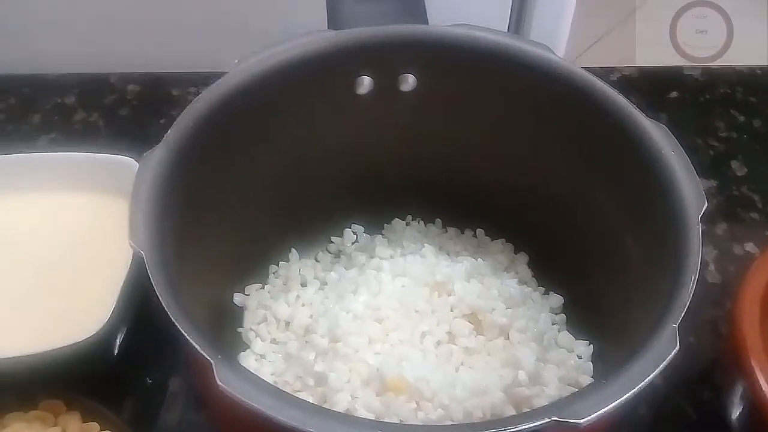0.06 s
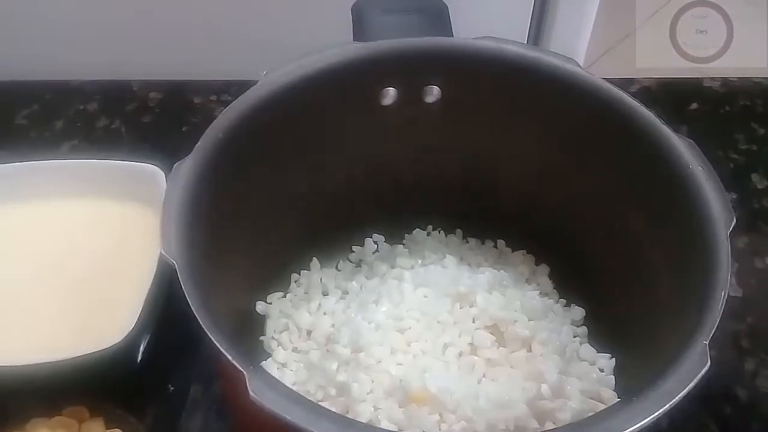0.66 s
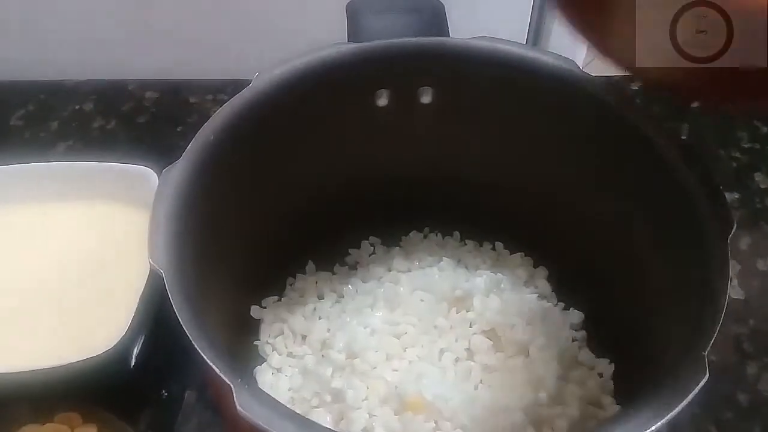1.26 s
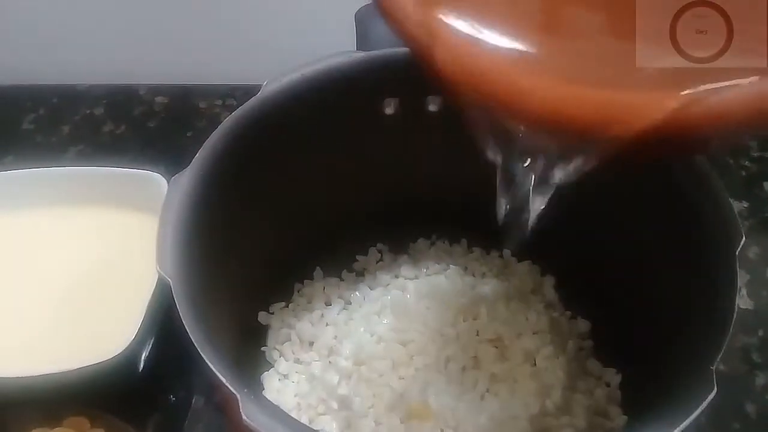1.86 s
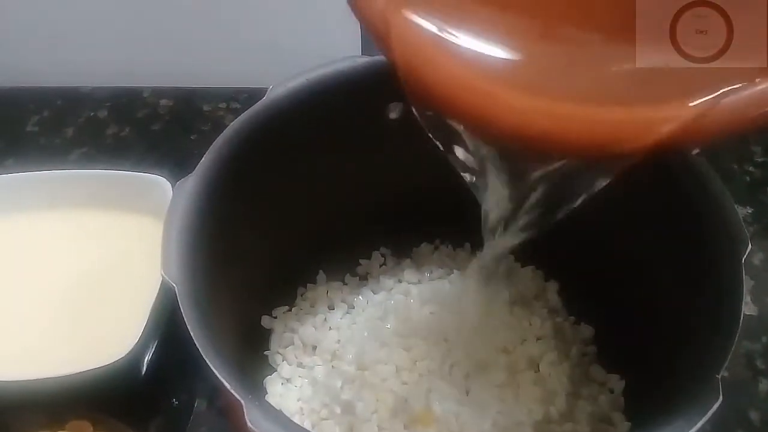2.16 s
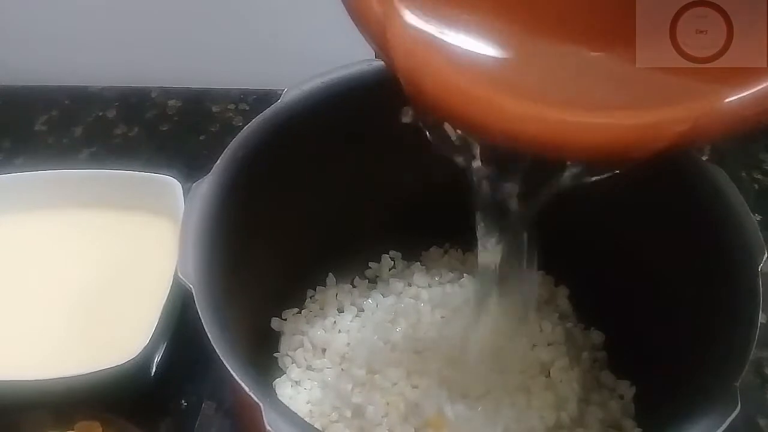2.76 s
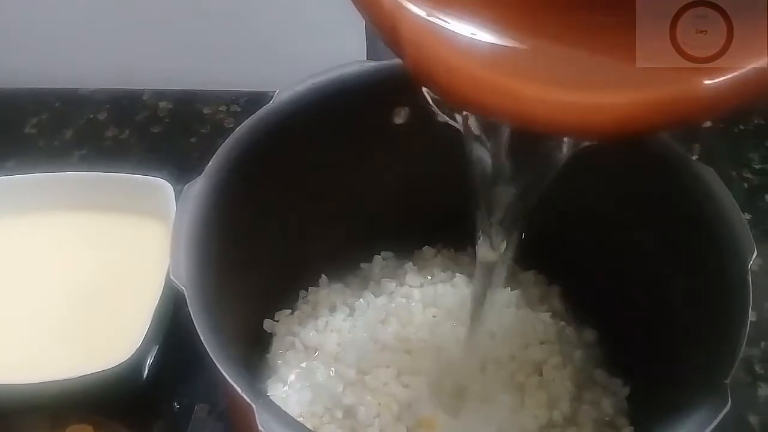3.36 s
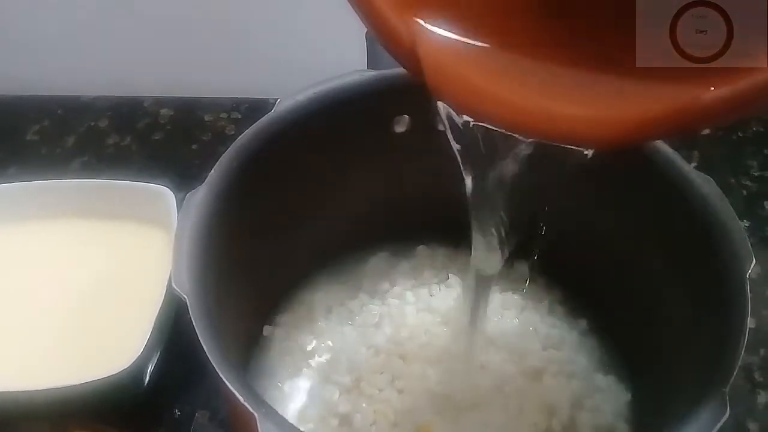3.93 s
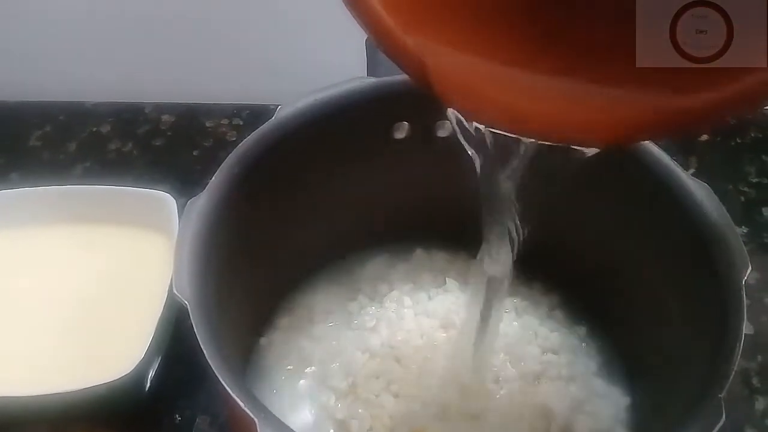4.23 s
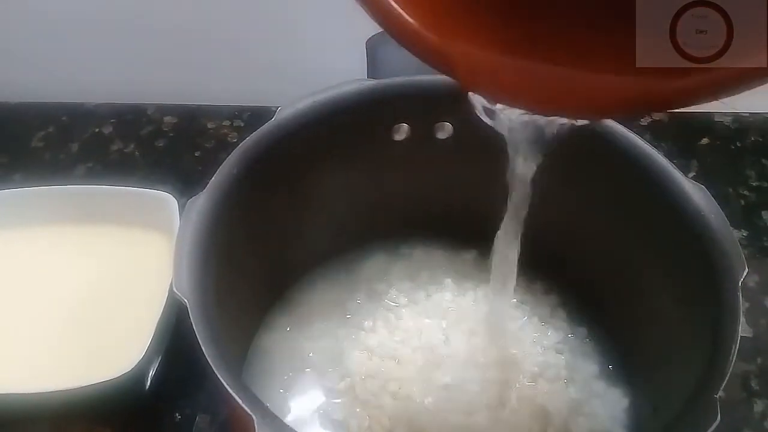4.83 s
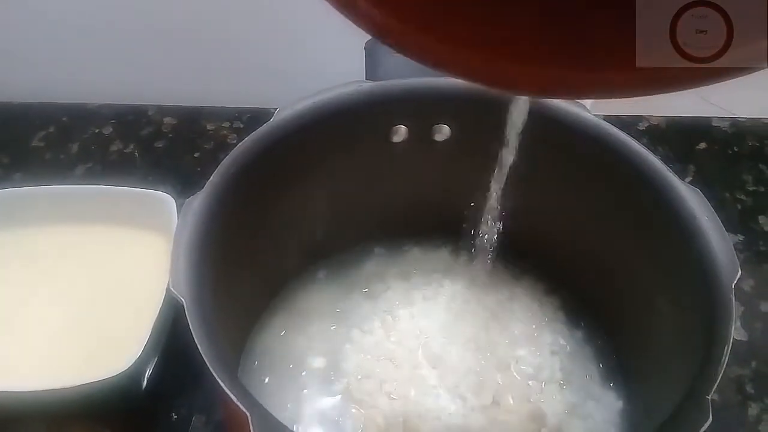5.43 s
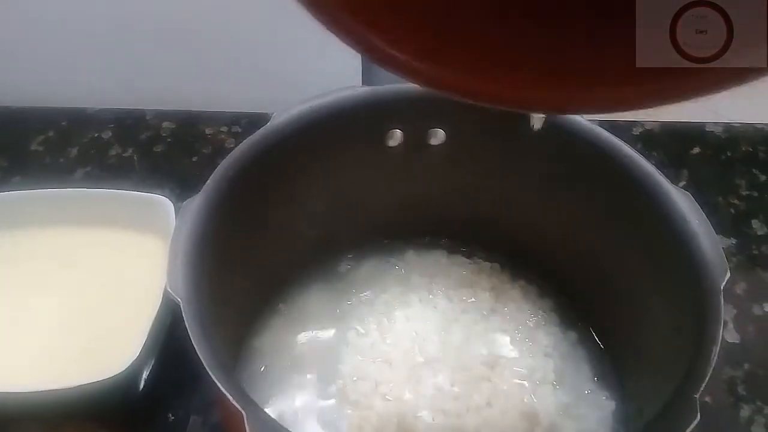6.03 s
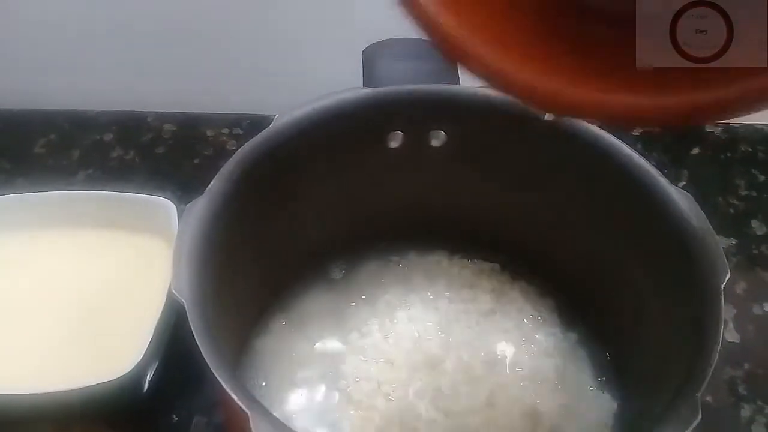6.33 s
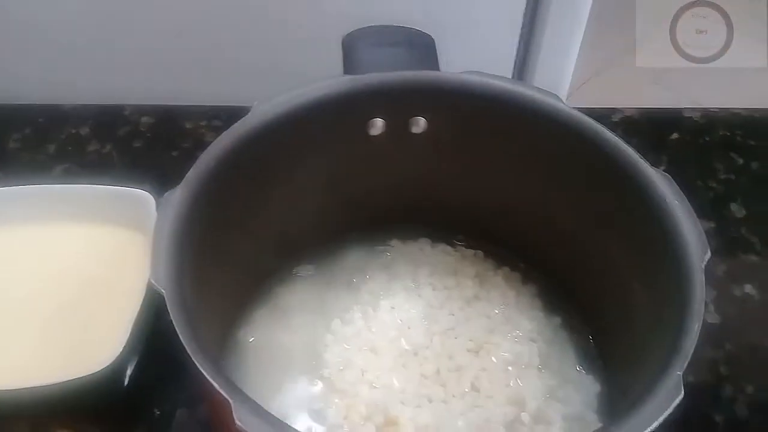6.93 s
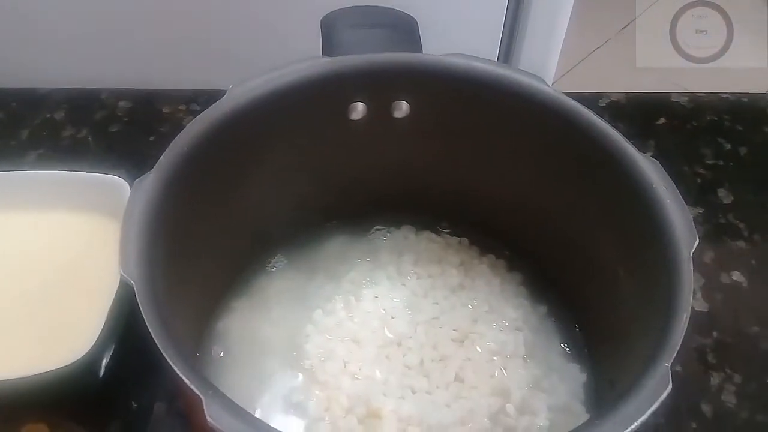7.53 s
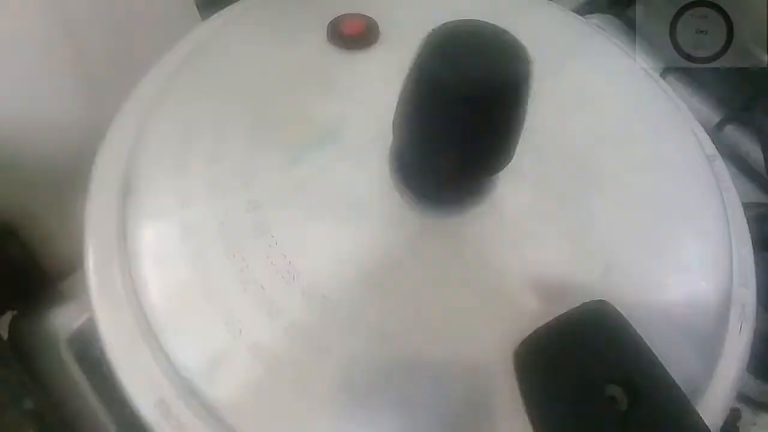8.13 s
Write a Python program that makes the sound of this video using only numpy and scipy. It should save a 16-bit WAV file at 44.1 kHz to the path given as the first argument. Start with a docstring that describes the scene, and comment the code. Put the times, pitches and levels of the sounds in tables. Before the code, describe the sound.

Water pours and patters onto corn in a metal pot, gurgling as it pools, over a kitchen hum; steam hisses at the very end.

```python
"""Water pours from a bowl onto corn in a metal pressure cooker, close by in a humming kitchen.
The stream patters on the kernels as a swarm of tiny ringing bubbles, then gurgles and glugs as a pool
rises; the air in the pot rings with it. The wet corn fizzes and a last drop falls.
At the very end the closed cooker hisses a jet of steam through its valve."""
import sys
import numpy as np
from scipy import signal
from scipy.fft import rfft, irfft, next_fast_len
from scipy.io import wavfile
from scipy.ndimage import uniform_filter1d, map_coordinates

SR = 44100
rng = np.random.default_rng(int(sys.argv[2]) if len(sys.argv) > 2 else 0)


def bounce(signal):
    """Save signal as a 16-bit WAV file at the path given by the first command-line argument."""
    frames = np.transpose(np.atleast_2d(signal))
    limited = np.clip(frames, -1, 1)
    pcm = np.round(limited * 32767).astype(np.int16)
    wavfile.write(sys.argv[1], SR, pcm)


N = 361179
TIME = np.arange(N) / SR
POUR_START_S, POUR_END_S = 2.034, 5.67

# how hard the stream lands as the bowl tips, ending in a gush: (time [s], force [dB])
POUR_FORCE = [(2.05, -0.5), (2.3, -.5), (2.56, 2), (2.73, -2.5), (3.09, 2.3), (3.3, -4), (3.74, -1),
              (3.9, 4.5), (4.3, 4), (4.54, 1.5), (4.72, 0.5), (4.87, 4), (5.03, -3), (5.18, 8), (5.38, 8),
              (5.58, 6), (5.68, -8.5)]
# air modes of the open pot: (frequency [Hz], width [Hz], level over the direct sound [dB])
POT_MODES = [(326.8, 6.9, 18), (504.5, 13.5, 17.5), (568, 8.4, 12), (635, 20, 2.5), (1106, 100, 8),
             (1550, 80, -7), (2152, 50, 5.5), (2916, 125, 5), (3486, 170, 5), (4104, 160, -7.5),
             (5110, 130, -5.5), (5520, 112, -1)]
# tone of the bright spray off the kernels: (frequency [Hz], level [dB])
SPRAY_EQ = [(1500, -32.5), (3000, -21.5), (4500, -2), (6000, -1.5), (8300, 4), (11000, 1.5), (14000, -1.5),
            (16000, -5)]
# tone of the deeper splash: (frequency [Hz], level [dB])
SPLASH_EQ = [(700, -16.5), (1050, -11), (1700, -7.5), (2050, 3.5), (2800, 6.5), (3800, 4.5), (5000, -0.5),
             (7500, -27.5)]


def amp(db):
    """Decibels to gain."""
    return 10 ** (np.asarray(db) / 20)


def unit(x):
    """Scale to rms 1."""
    return x / np.sqrt(np.mean(x ** 2) + 1e-20)


def along(points, hz):
    """Read (frequency [Hz], value) points on a log axis."""
    freqs, values = np.transpose(points)
    return np.interp(np.log(hz + 1), np.log(freqs + 1), values)


def automation(points, times=TIME):
    """Read (time [s], value) points, joined by straight ramps."""
    return np.interp(times, *np.transpose(points))


def gate(start, stop, rise, fall):
    """Ramps open at start and dies away after stop; all in seconds."""
    return np.clip((TIME - start) / rise, 0, 1) * np.exp(-np.maximum(TIME - stop, 0) / fall)


def wobble(rate):
    """A smooth random curve, rate knots a second."""
    return map_coordinates(rng.standard_normal(2048), [TIME * rate], mode="wrap")


def filtered(x, response):
    """Filter x by a complex response of frequency."""
    size = next_fast_len(N + SR // 2)
    return irfft(rfft(x, size) * response(np.fft.rfftfreq(size, 1 / SR)), size)[..., :N]


def equalised(x, eq):
    """Shape x by (frequency [Hz], level [dB]) points."""
    return filtered(x, lambda hz: amp(along(eq, hz)))


def noise(eq, shape=N):
    """Noise at rms 1, coloured by (frequency [Hz], level [dB]) points."""
    return unit(equalised(rng.standard_normal(shape), eq))


def resonance(f, hz, width):
    """Complex response of one mode at the frequencies f."""
    return 1j * f * width / (hz * hz - f * f + 1j * f * width)


def ringing(x, modes):
    """The direct sound plus the modes it excites: (frequency [Hz], width [Hz], level [dB])."""
    return filtered(x, lambda f: 1 + sum(amp(db) * resonance(f, hz, width) for hz, width, db in modes))


def singing_mode(hz, width_hz):
    """One mode kept ringing by noise, at rms 1."""
    return unit(filtered(rng.standard_normal(N), lambda f: resonance(f, hz, width_hz) ** 2))


def bubbles(onsets, gain, hz, cycles, glide, samples):
    """Sines that decay by 1/e in the given cycles and rise in pitch as they near the surface."""
    turns = hz[:, None] * (np.arange(samples) / SR)
    age = turns / np.reshape(cycles, (-1, 1))
    envelope = gain[:, None] * np.exp(-age) * (1 - np.exp(-turns))
    waves = envelope * np.sin(2 * np.pi * turns * (1 + glide * age / (1 + age / 4)))
    positions = (onsets * SR).astype(int)[:, None] + np.arange(samples)
    return np.bincount(positions.ravel(), waves.ravel(), N)[:N]


def swarm(eq, low_hz, high_hz, cycles, spread_db, wash_db, count, samples):
    """Scattered bubbles over a wash of finer ones in the pot, as mid and side; the mid holds rms 1."""
    when, pitch, strength, life = rng.random((count, 4)).T
    gain = amp(-spread_db * np.log(1 - 0.97 * strength))  # many faint, a few loud
    hz = low_hz * (high_hz / low_hz) ** pitch
    grains = bubbles(when * N / SR, gain, hz, cycles * 2 ** (2 * life - 1), glide=0.03, samples=samples)
    wash = rng.standard_normal((2, N))
    mid = unit(grains) + amp(wash_db) * wash[0]
    side = equalised(wash[1], [(300, -24), (3500, -42), (5500, -27), (11000, -33.5)])
    in_pot = ringing(equalised(np.array([mid, side]), eq), POT_MODES)
    running_power = np.abs(uniform_filter1d(in_pot[0] ** 2, size=5000))
    return in_pot / np.sqrt(running_power + 1e-12)


def patchy(x, depth_db):
    """Droplets come in showers of like size, so the colour shifts from moment to moment."""
    spectra = signal.stft(x, nperseg=128)[2]
    patches = uniform_filter1d(rng.standard_normal(spectra.shape[1:]), size=7, axis=0)
    patches = unit(uniform_filter1d(patches, size=9, axis=1))
    trim_db = depth_db ** 2 * np.log(10) / 20  # holds the average power
    return signal.istft(spectra * amp(depth_db * patches - trim_db), nperseg=128)[1][:, :N]


def strays(level_db, count, scatter_db=3):
    """Light impacts strewn through the pour, growing with its force: (time [s], level [dB])."""
    place, size = rng.random((count, 2)).T
    onsets = POUR_START_S + (POUR_END_S - POUR_START_S) * (np.arange(count) + place) / count
    levels = level_db + automation(POUR_FORCE, onsets) + scatter_db * (2 * size - 1)
    return np.column_stack([onsets, levels])


def murmur():
    """The kitchen's low murmur wavers and rings in the pot; the bowl held above throws more back."""
    # room tone: (frequency [Hz], level [dB])
    room_eq = [(25, -24), (49, -12.5), (92, -16.5), (115, -8.5), (170, -4.5), (200, -12), (250, -13.5),
               (394, -16), (545, -29), (1100, -31), (1740, -40), (2300, -39), (2600, -41.5), (4300, -44.5),
               (6000, -58)]
    # pot modes that the room excites: (frequency [Hz], width [Hz], level [dB])
    murmur_modes = [(1114, 150, -3.5), (1495, 34, 3.5), (2184, 130, 8.5), (2180, 80, -6)]
    bed = amp(-55 + 0.96 * wobble(5)) * unit(ringing(noise(room_eq), murmur_modes))
    thrown_back = noise([(300, -15), (500, 10.5), (900, -7.5), (2000, -2), (2800, -17),
                         (4500, -13.5), (6000, -37.5)])
    return bed + amp(-67.5) * thrown_back * gate(1.45, 6.1, rise=0.15, fall=0.27)


def motor_hum():
    """A motor hums; each partial is part steady, part drifting in level and phase."""
    # motor tones: (frequency [Hz], level [dB], unsteady share [0-1])
    partials = [(43.5, -66.5, 0.6), (122.4, -63, 0.4), (129.9, -69, 0.79), (170.4, -55.5, .45),
                (236.3, -68, 0.7), (258, -65.5, 1)]
    hum = np.zeros(N)
    for hz, db, unsteady in partials:
        swell = np.sqrt(2 * (1 - unsteady)) + np.sqrt(unsteady) * (wobble(12) + 1j * wobble(12))
        hum += amp(db) * np.real(swell * np.exp(2j * np.pi * hz * TIME))
    return hum


def hiss():
    """A faint, wide hiss lies under everything."""
    return amp(-76) * noise([(2000, -10), (5000, 4.5), (16000, 5)], shape=(2, N))


def bump():
    """One soft, dull bump opens the scene."""
    thud = noise([(150, -19.5), (380, -1.5), (480, -2.5), (650, -19), (3000, -32), (8000, -64)])
    return amp(-55.5) * thud * gate(0.038, 0.11, rise=0.034, fall=0.051)


def stream():
    """Falling water sprays on the kernels, splashes, churns the pool and keeps a pot mode singing."""
    # water pooling over the corn: (time [s], share covered [0-1])
    pool_cover = [(2.45, 0), (3.5, 0.25), (3.85, 0.6), (4.22, 1)]
    # the pot's cross mode under the stream: (time [s], level [dB])
    ring_levels = [(2.4, -63), (2.5, -44.5), (2.78, -63.5), (3.08, -47.5), (3.3, -54), (3.72, -59.5),
                   (4.37, -47), (5.05, -65), (5.55, -59.5)]
    # tone of the churning pool: (frequency [Hz], level [dB])
    gurgle_eq = [(180, -23.5), (320, -13.5), (420, -10), (510, -2.5), (650, -5), (820, -6.5), (1150, -6),
                 (1700, -2.5), (2600, -9.5), (4000, -39.5)]
    force_db, pool = automation(POUR_FORCE), automation(pool_cover)
    spray_db = -47 + 0.8 * force_db - 4.5 * pool ** 2.5  # ducks once the kernels are nearly covered
    splash_db = -51.5 + 1.05 * force_db + pool
    gurgle_db = -67.5 + force_db + 20 * pool
    lumps_db = 1.22 * wobble(90) + 1.58 * wobble(35)  # fast beading and slower surges

    fine = swarm(SPRAY_EQ, 4014, 16000, cycles=3.4, spread_db=5, wash_db=-1.5, count=18000, samples=200)
    spray = amp(spray_db + lumps_db + 0.97 * wobble(50)) * patchy(fine, depth_db=3)
    medium = swarm(SPLASH_EQ, 1076, 6100, cycles=2.2, spread_db=2, wash_db=0, count=10000, samples=360)
    splash = amp(splash_db + lumps_db) * patchy(medium, depth_db=3.5)
    large = swarm(gurgle_eq, 341, 2010, cycles=1.4, spread_db=2, wash_db=1.5, count=3000, samples=800)
    gurgle = amp(gurgle_db) * large
    ring_db = automation(ring_levels) + lumps_db + 3 * wobble(40)
    ring = amp(ring_db) * singing_mode(2176, width_hz=120) * [[1], [0]]  # mid only
    return (spray + splash + gurgle + ring) * gate(POUR_START_S, POUR_END_S, rise=0.026, fall=0.026)


def drops():
    """Single drops plink, slaps crack and air pockets glug inside the pot."""
    # the clearest drops and small bubbles: (time [s], level [dB], pitch [Hz])
    clear_drops = [(2.0481, -21, 4760), (2.0744, -29.5, 1880), (2.4744, -26.5, 2150), (2.9735, -30.5, 2180),
                   (3.0708, -21, 2220), (3.5647, -29, 2210), (3.6176, -20, 10980), (3.9598, -22, 2140),
                   (4.0605, -25.5, 2950), (4.0952, -19.5, 5630), (4.1123, -26.5, 2980),
                   (4.2452, -17.5, 4630), (4.2705, -11, 8350), (5.1425, -16, 3600), (5.162, -24, 3460),
                   (5.3036, -22, 3624), (5.3212, -10, 10600), (5.3451, -19.5, 3420), (5.4, -11, 8430),
                   (5.4114, -13.5, 10600), (5.5308, -15.5, 6645), (5.7304, -25, 7640)]
    # sharp slaps as the stream breaks up: (time [s], level [dB], pitch [Hz])
    slap_hits = [(5.382, -8, 3992), (5.3814, -14, 6400), (5.5312, -21, 3800), (5.582, -21, 3600)]
    # large air pockets pulled under: (time [s], level [dB], pitch [Hz])
    air_pockets = [(2.825, -37.5, 1170), (2.866, -36, 1120), (4.22, -19.5, 617), (4.236, -21, 542),
                   (4.374, -21, 563), (4.392, -24, 484), (4.844, -35.5, 496), (5.099, -25, 625),
                   (5.187, -25, 1110), (5.199, -24.5, 510), (5.275, -21.5, 1069), (5.277, -23.5, 498),
                   (5.35, -24, 1160)]
    light_drops = strays(level_db=-33.5, count=36)
    light_hz = 3578 * 2 ** (0.56 * rng.standard_normal(len(light_drops)))
    onsets, db, hz = np.vstack([clear_drops, np.column_stack([light_drops, light_hz])]).T
    plinks = bubbles(onsets, amp(db - 5.5), hz, cycles=7.35, glide=0.0088, samples=2048)
    onsets, db, hz = np.transpose(slap_hits)
    slaps = bubbles(onsets, amp(db + 10), hz, cycles=1.4, glide=0.08, samples=1024)
    onsets, db, hz = np.transpose(air_pockets)
    glugs = bubbles(onsets, amp(db - 1.5), hz, cycles=2.13, glide=0.014, samples=4096)
    return ringing(plinks + slaps + glugs, POT_MODES)


def splats():
    """Each bead bursting on the kernels throws a brief shower of droplets and a deeper splash."""
    # the heaviest beads of the stream: (time [s], level [dB])
    heavy_beads = [(2.297, -27), (2.461, -28), (2.7727, -31.5), (2.8663, -28.5), (2.9499, -26),
                   (3.0898, -24.5), (3.127, -29.5), (3.2255, -29), (3.4058, -28), (3.565, -24.5),
                   (3.8206, -23), (3.912, -21.5), (3.9614, -20.5), (4.119, -20), (4.372, -27),
                   (4.7861, -24), (4.8438, -24.5), (5.25, -22), (5.3066, -21), (5.381, -14), (5.402, -17),
                   (5.4451, -22.5), (5.532, -21.5), (5.5817, -21)]
    attack_s, release_s = 0.0016, 0.0026
    t = np.arange(2048) / SR
    envelope = (1 - np.exp(-t / attack_s)) * np.exp(-t / release_s)
    bursts = np.zeros(N)
    for onset, db in np.vstack([heavy_beads, strays(level_db=-32, count=32)]):
        bursts[round(onset * SR):][:len(t)] += amp(db) * envelope
    droplets = patchy(noise(SPRAY_EQ, shape=(2, N)), depth_db=4) * amp([[-1.5], [-9]])  # mid, side
    splash = noise(SPLASH_EQ, shape=(2, N)) * amp([[-8.5], [-26.5]])
    return ringing(bursts * (droplets + splash), POT_MODES)


def pot_wall():
    """The last heavy gush shakes the pot, whose wall hums in its lowest mode."""
    return amp(-51) * singing_mode(329, width_hz=19) * gate(5.1, 5.58, rise=0.06, fall=0.057)


def seep():
    """Tiny bubbles fizz as the water sinks between the kernels."""
    fizz_eq = [(1500, -23.5), (2200, 1), (3200, -13), (5200, -11), (7500, -0.5), (11000, -5),
               (15500, -12)]
    fizz = swarm(fizz_eq, 4000, 14000, cycles=4, spread_db=0, wash_db=-0.5, count=9000, samples=200)
    return amp(-62.5) * fizz * gate(5.64, 5.995, rise=0.05, fall=0.15)


def last_drop():
    """A last drop from the bowl clacks in the pot and rings briefly."""
    clack = noise([(1500, -39), (2150, 0), (2500, 4), (2950, 4), (3400, -17), (7500, -22), (13000, -31)])
    hit = gate(6.309, 6.314, rise=0.003, fall=0.003)
    tail = amp(-12) * gate(6.312, 6.32, rise=0.006, fall=0.06)
    return amp(-51) * clack * (hit + tail)


def steam():
    """The valve spits once, then a steady turbulent jet whistles through it."""
    # tone of the jet: (frequency [Hz], level [dB])
    jet_eq = [(120, -43), (200, -3.5), (473, -12), (899, -9), (1000, -10), (1160, -7.5), (1980, -6.5),
              (2170, -11.5), (2470, -3), (4350, -8), (5040, -15), (7270, -6), (11300, -7.5), (13800, -5.5),
              (16000, -17)]
    whistle_modes = [(3220, 280, -6), (4530, 300, 7), (8040, 1200, -3.5), (11020, 1100, -3.5)]
    jet = unit(ringing(noise(jet_eq), whistle_modes))
    spit = amp(-9) * gate(8.073, 8.078, rise=0.003, fall=0.00092)
    valve_open = automation([(8.08, 0), (8.08399, 1)])
    return amp(-32) * jet * (spit + valve_open)


def kitchen_reverb(x):
    """Hard walls answer briefly, as mid and side; the image stays narrow."""
    # decay of the room: (frequency [Hz], time to fall 60 dB [s])
    decay_times = [(200, .45), (1000, 0.56), (3000, 0.42), (8000, 0.41), (15000, .25)]
    # stereo width of the reverb: (frequency [Hz], side over mid [dB])
    width_eq = [(100, -21), (1000, -34), (2400, -36.5), (5000, -29), (10000, -16)]
    hz, t, spectra = signal.stft(rng.standard_normal((2, SR // 2)), SR, nperseg=256)
    decay = amp(-60 * t / along(decay_times, hz)[:, None])
    tail = signal.istft(spectra * decay, SR, nperseg=256)[1]
    tail = np.pad(tail, ((0, 0), (128, 0))) / np.linalg.norm(tail[0])  # 3 ms of pre-delay
    mid, side = signal.fftconvolve(x[None], tail, axes=1)[:, :N]
    return np.array([mid, equalised(side, width_eq)])


def scene():
    """Water in the pot with its reverb, the kitchen's ambience and the steam, as left and right."""
    water = stream() + splats() + seep()
    water[0] += drops() + last_drop() + pot_wall()  # dead centre
    mid, side = water + amp(-11) * kitchen_reverb(water[0])
    ambience = murmur() + bump() + motor_hum() + hiss()
    return np.array([mid + side, mid - side]) + ambience + steam()


def record(dry):
    """The microphone keeps nothing above its band limit."""
    return filtered(dry, lambda hz: hz < 15950)


dry = scene()
out = record(dry)
bounce(out)
```